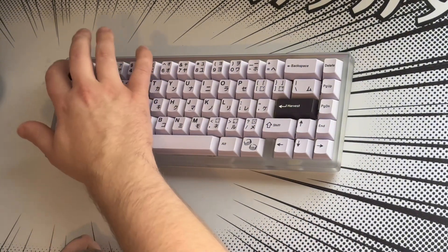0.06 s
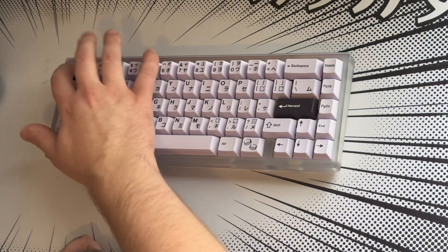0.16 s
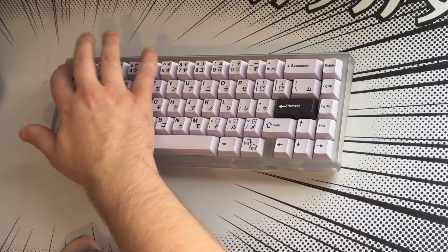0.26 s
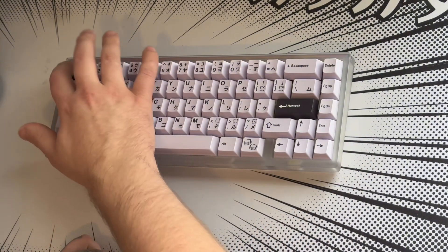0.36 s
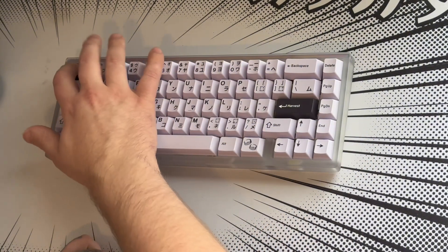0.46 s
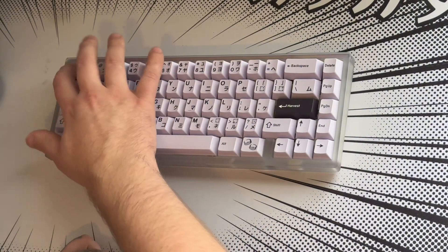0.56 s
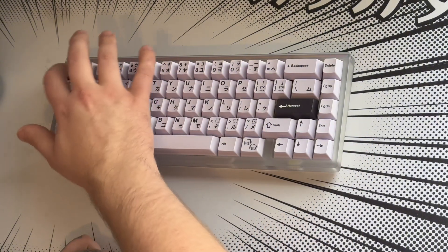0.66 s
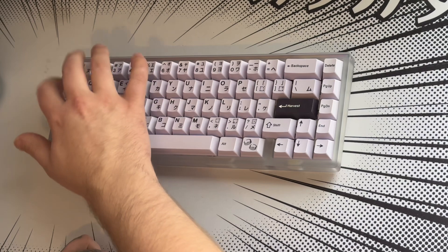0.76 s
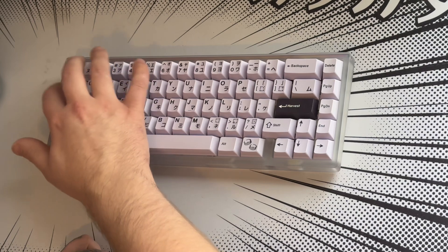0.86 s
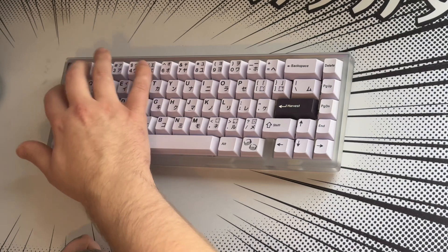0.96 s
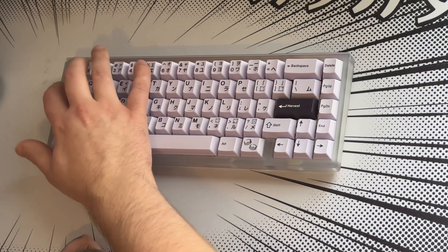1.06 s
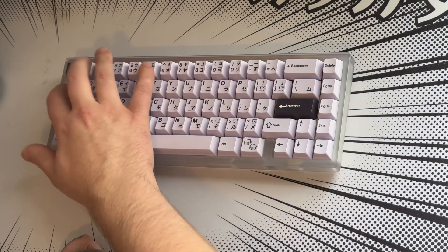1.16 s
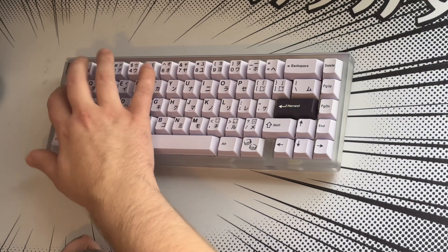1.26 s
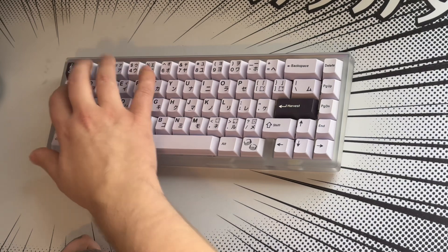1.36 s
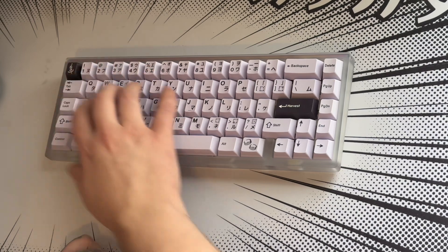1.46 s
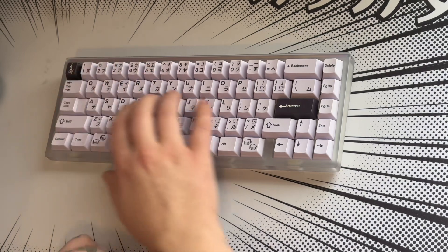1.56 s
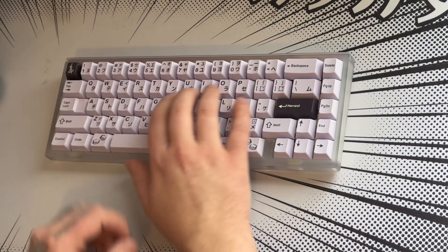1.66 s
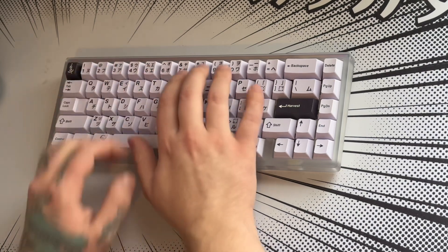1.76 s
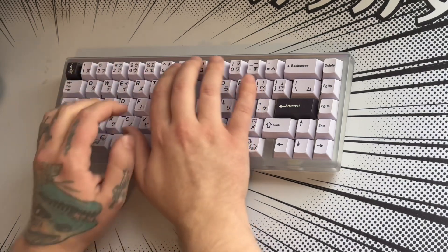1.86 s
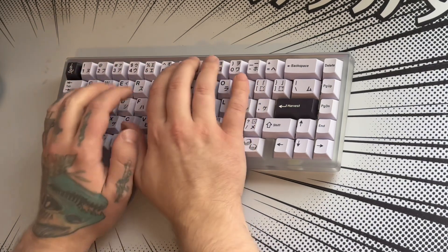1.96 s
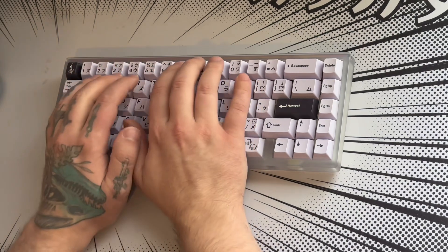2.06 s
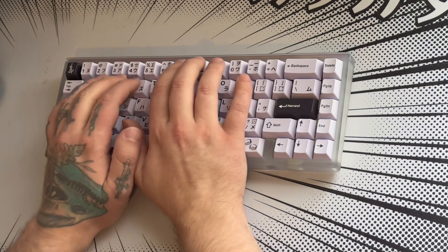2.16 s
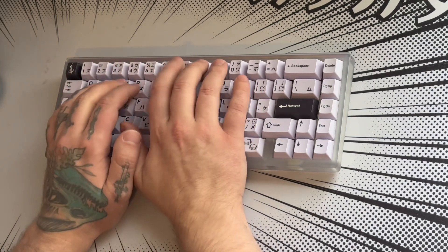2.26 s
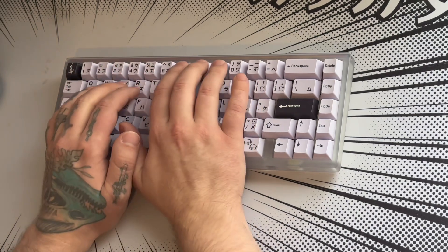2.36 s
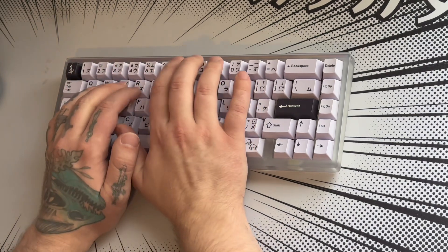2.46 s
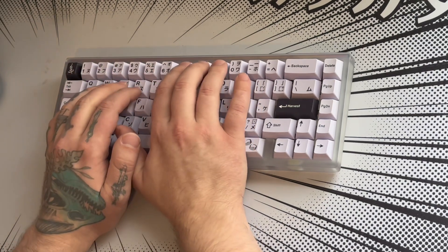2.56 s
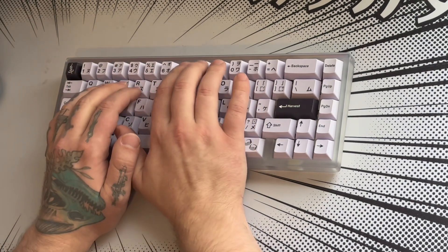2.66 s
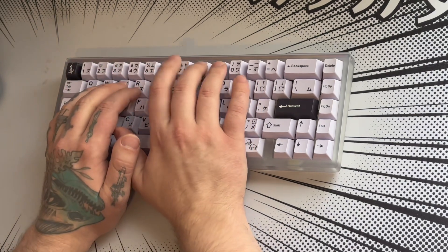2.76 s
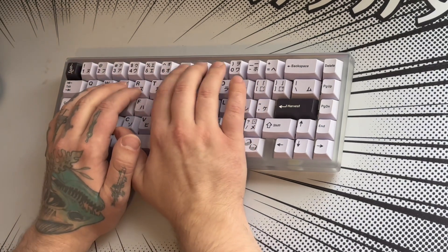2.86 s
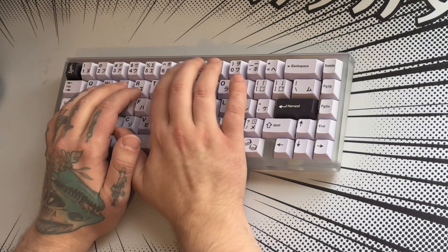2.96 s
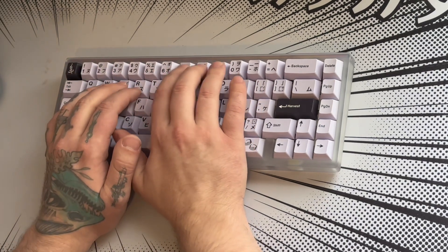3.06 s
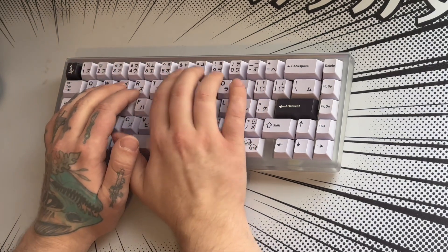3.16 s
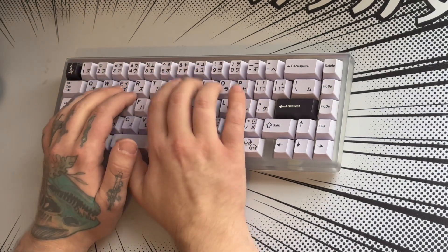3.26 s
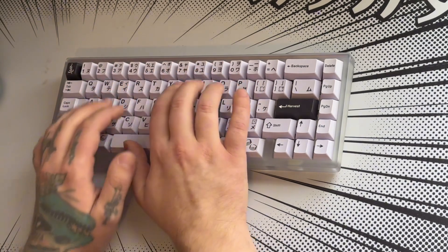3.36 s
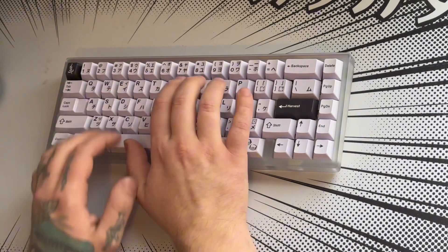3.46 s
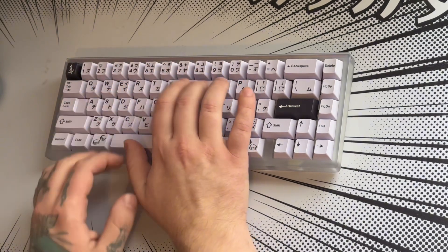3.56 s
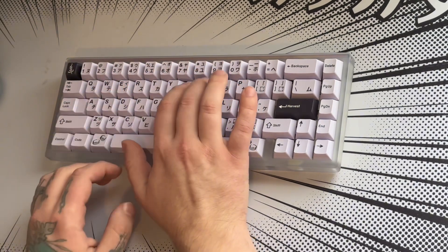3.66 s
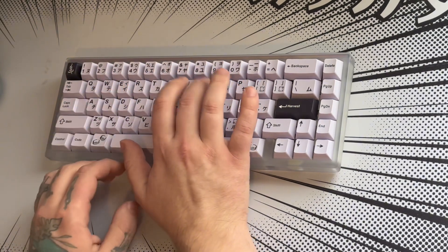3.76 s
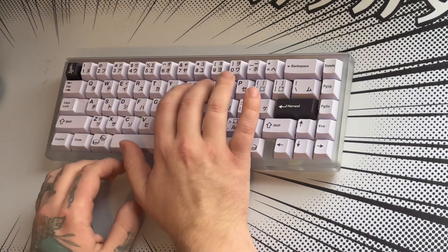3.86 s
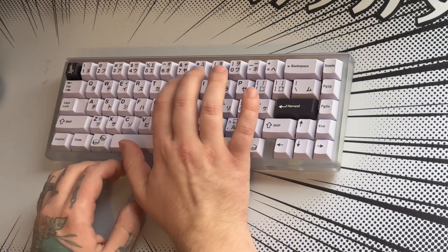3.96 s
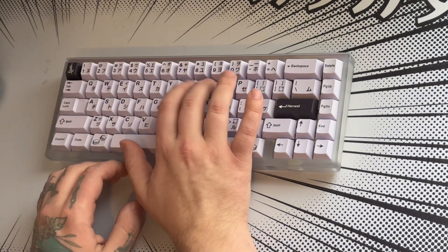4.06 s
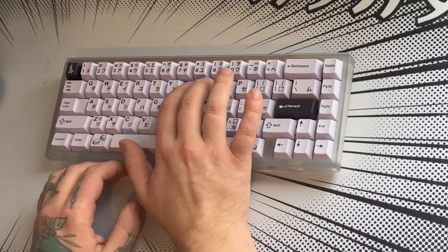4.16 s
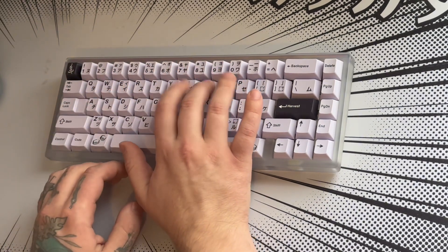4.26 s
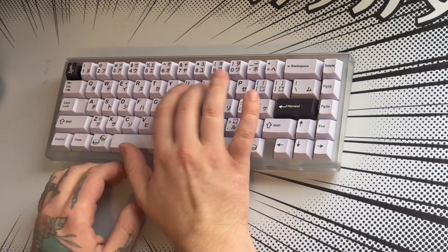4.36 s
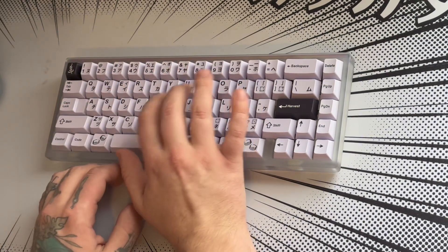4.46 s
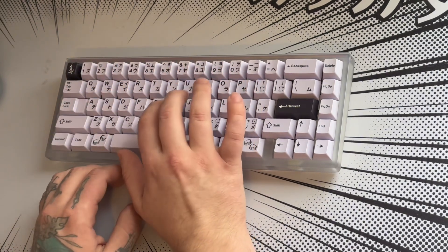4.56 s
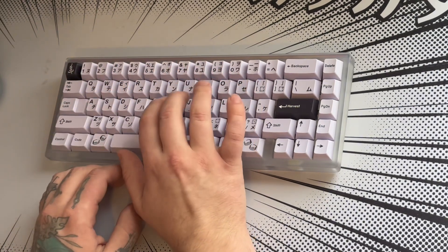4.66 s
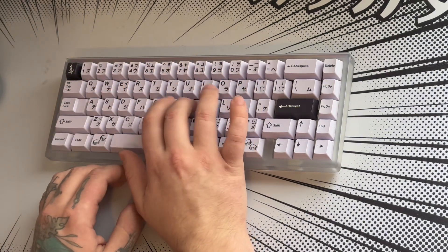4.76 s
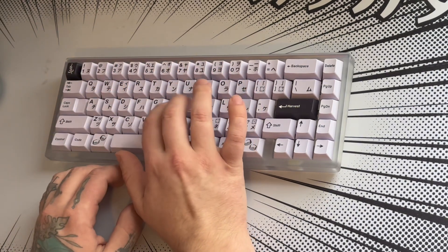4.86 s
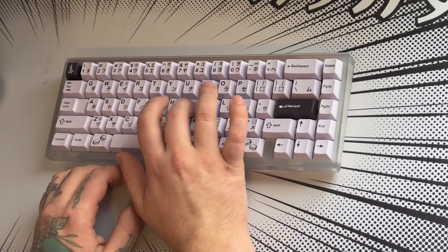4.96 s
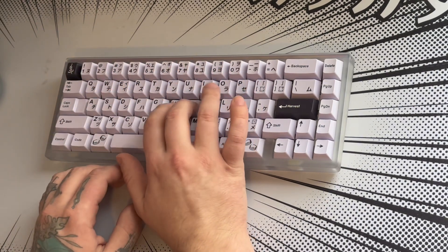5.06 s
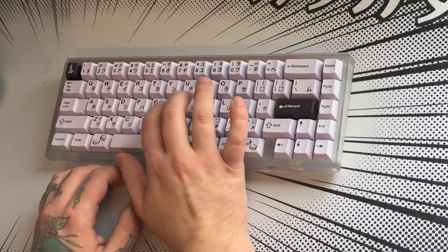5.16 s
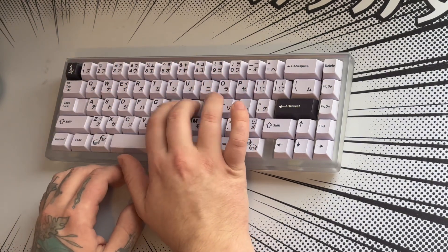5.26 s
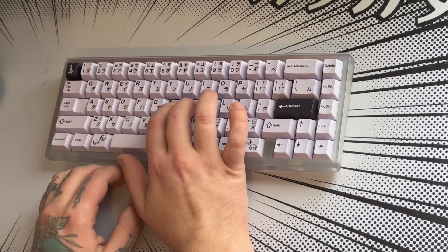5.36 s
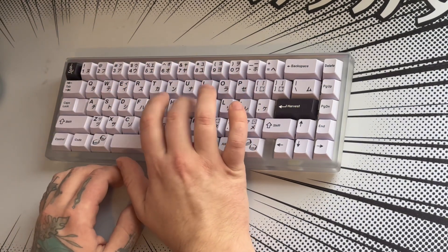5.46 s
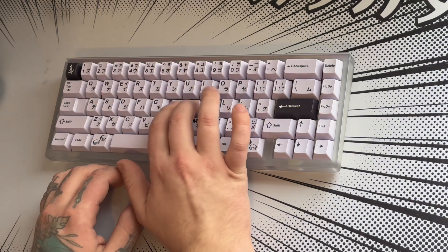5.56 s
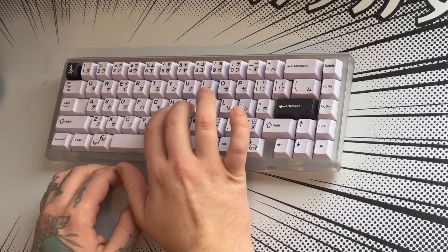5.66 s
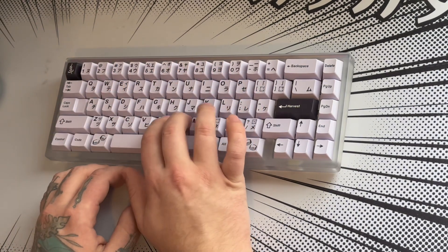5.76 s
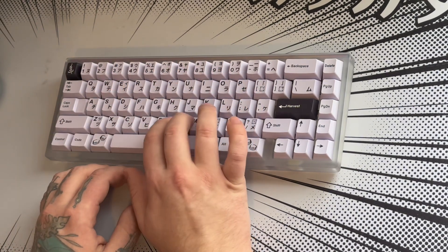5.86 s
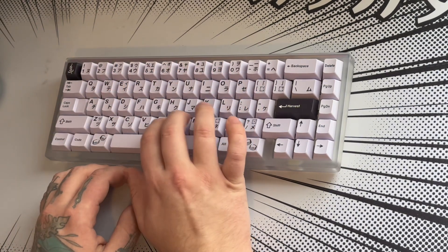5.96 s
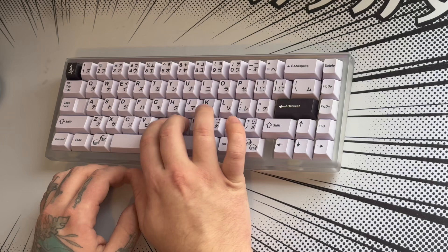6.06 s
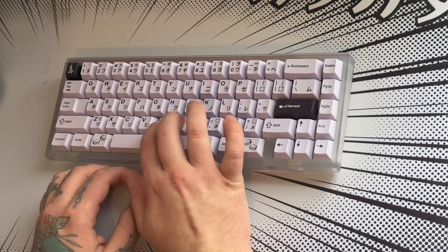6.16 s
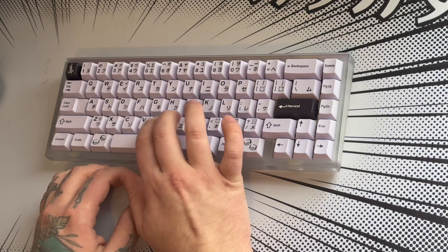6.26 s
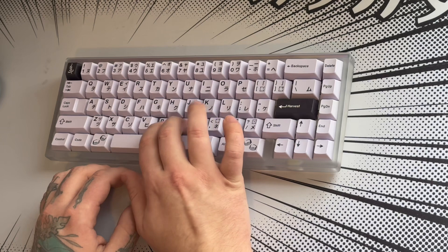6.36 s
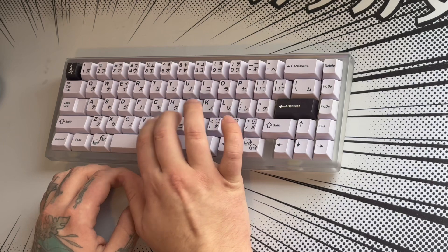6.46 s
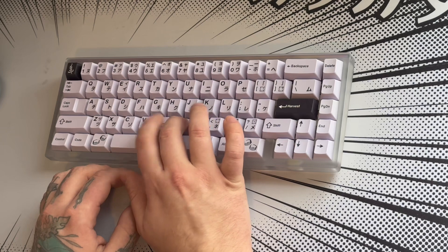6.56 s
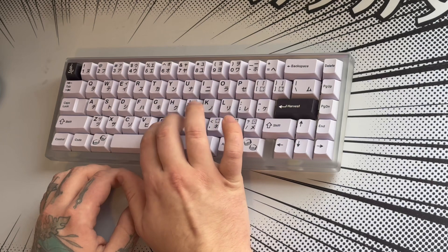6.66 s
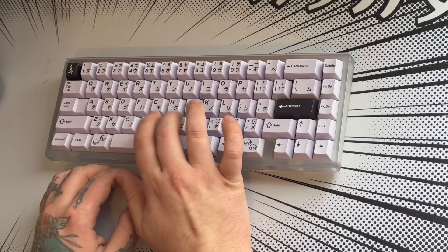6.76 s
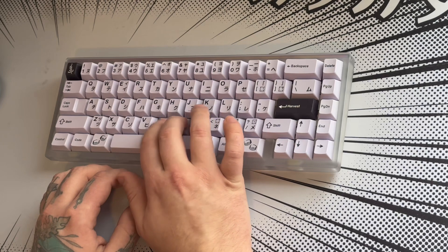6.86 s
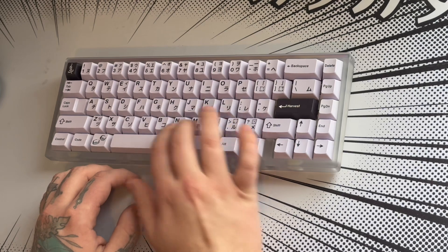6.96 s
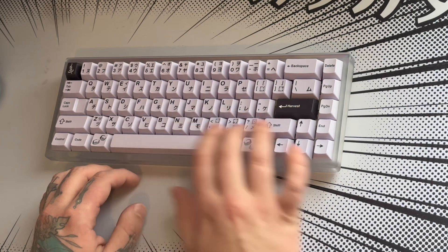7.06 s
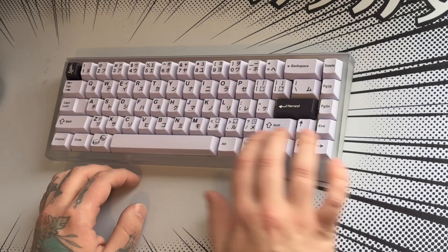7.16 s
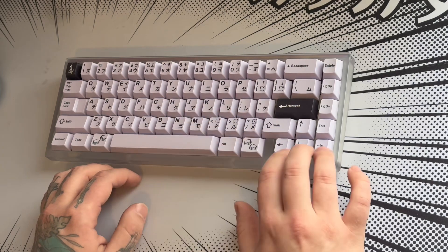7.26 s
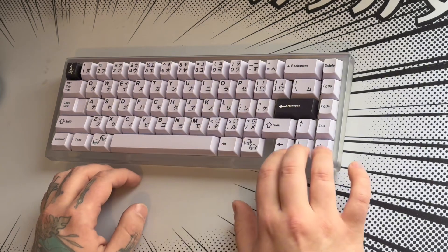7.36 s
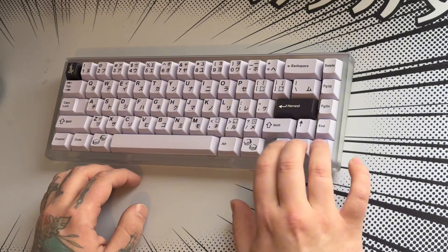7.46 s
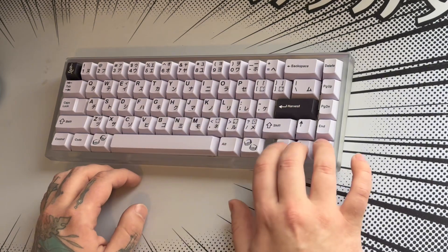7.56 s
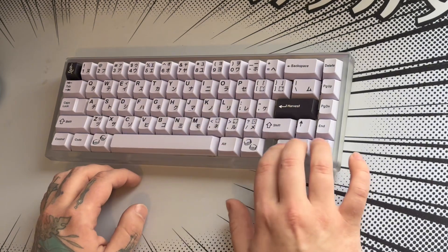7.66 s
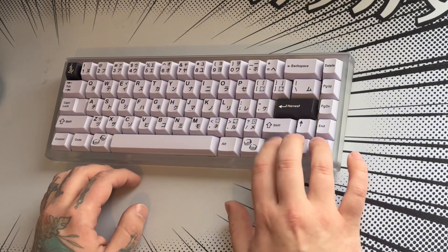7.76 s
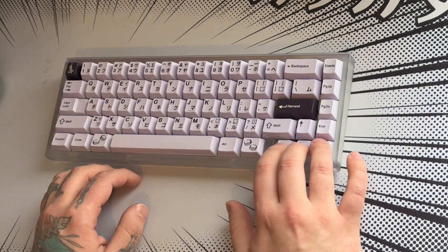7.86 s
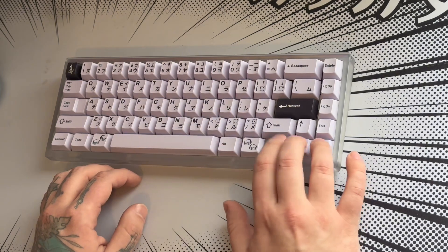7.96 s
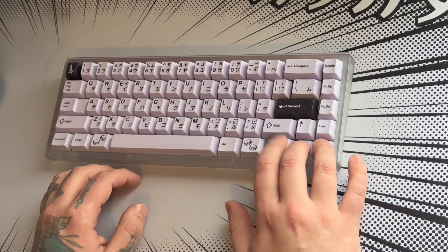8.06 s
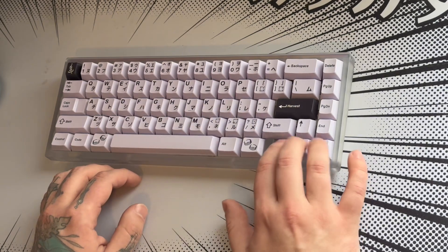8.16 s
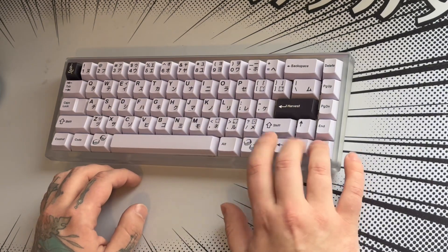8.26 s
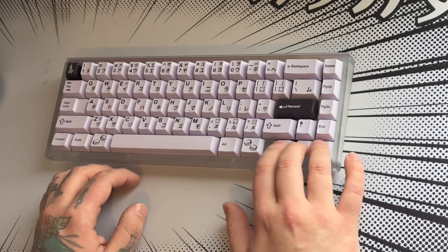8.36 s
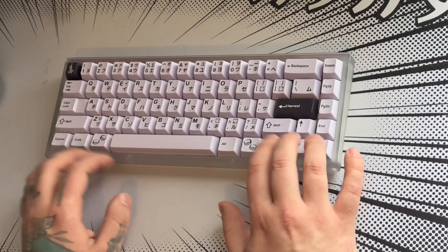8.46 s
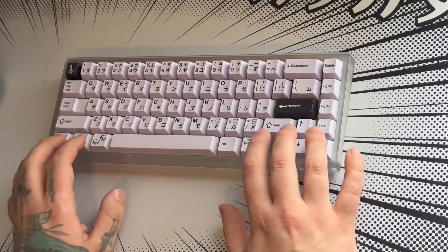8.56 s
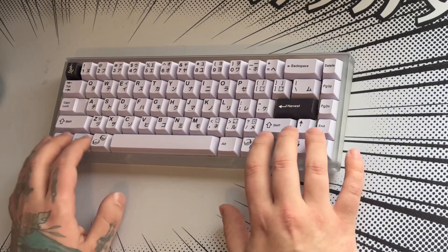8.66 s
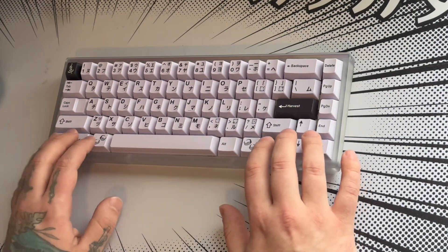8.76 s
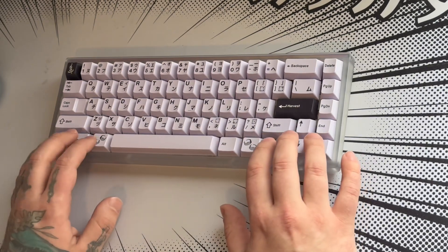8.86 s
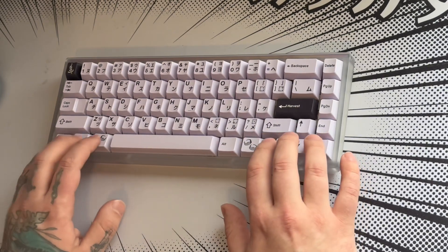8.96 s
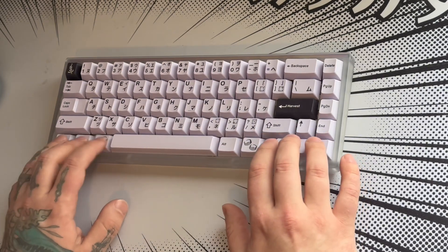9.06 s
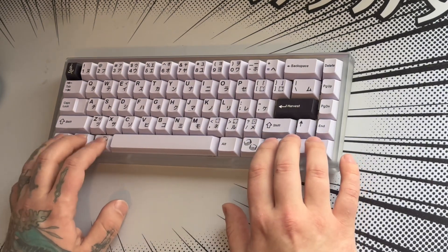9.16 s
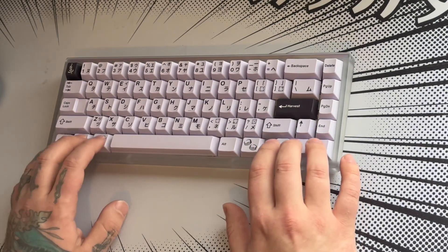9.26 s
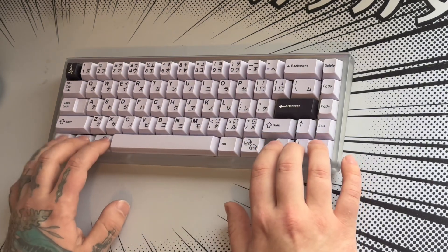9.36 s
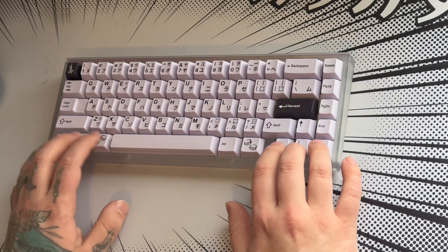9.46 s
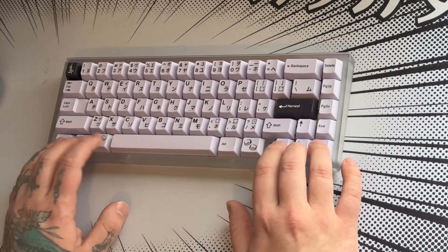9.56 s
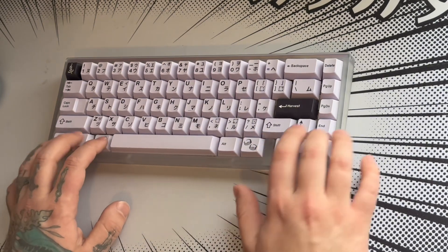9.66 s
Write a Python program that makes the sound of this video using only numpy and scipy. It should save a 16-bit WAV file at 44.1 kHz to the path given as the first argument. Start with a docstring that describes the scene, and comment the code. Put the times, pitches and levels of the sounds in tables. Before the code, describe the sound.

Fast mechanical keyboard typing in separate runs, first muted clacks, then the loudest bright strokes, with faint hand slides between in a quiet small room.

```python
"""A low room rumble with wavering hums and a fading hollow ring, then quick runs of mechanical-keyboard strokes.
Each press, release or tap is a tiny rattle that rings plate, keycap, housing and stem, and thumps the desk.
Hands hiss as they slide, mostly between runs; fingertips rub keycaps, a hand brushes the case, wrists bump the desk.
A small room answers with near reflections and a short tail; two microphone ports hear keys and hands out of step."""
import sys
import numpy as np
from scipy import signal
from scipy.fft import rfft, irfft
from scipy.io import wavfile
from scipy.ndimage import uniform_filter1d

SR = 44100
rng = np.random.default_rng(int(sys.argv[2]) if len(sys.argv) > 2 else 0)


def persist_wave(psi):
    """Save psi, clipped to +-1, as 16-bit WAV."""
    counts = np.round(np.clip(psi, -1, 1) * 32767).astype(np.int16)
    wavfile.write(sys.argv[1], SR, np.atleast_2d(counts).T)


N = 427329

# colour of the room rumble: f/Hz, relative density/dB
RUMBLE_COLOUR = [(15, -2), (27, -5.5), (36, -9.5), (50, 3), (70, -0.5), (120, 0.5), (150, -7.5),
                 (250, -7.5), (450, -12.5), (700, -20), (1100, -23), (2000, -30.5), (5000, -43),
                 (16000, -59)]
RUMBLE_RMS_DB = -60.5  # before the surge and the left-right offset
# steady hums: f/Hz, rms level/dB before the left-right offset
HUMS = [(48.5, -73), (164, -73.5), (343, -78)]
# left-right likeness of the rumble: f/Hz, correlation/1
LIKENESS = [(30, 1), (120, 0.94), (300, 0.86), (500, 0.78), (800, 0.08), (1200, 0.13), (2000, 1),
            (16000, 0.64)]
# colour of the case hollow's ring: f/Hz, relative level/dB
HOLLOW_COLOUR = [(1500, -30.5), (2000, -4.5), (2300, -5), (2750, -1.5), (3100, -5.5), (3600, -16.5),
                 (6000, -31.5)]
# strokes, run by run: t/s, strength/dB, rattle rise time/s, sharpness of tick and snap/dB, action
STROKES = [ (.0221, -8.5, 0.0013, -4.5, "escape"), (.087, -29, 0.00092, -4, "finger lands"),
           (.1, -3.5, 0.0017, 3, "escape"), (.179, -7, 0.0015, -1.5, "escape"),
           (.2498, -24, .0013, 1, "finger settles"), (0.2716, -6.5, 0.0016, 2.5, "escape"),
           (0.3408, -7, 0.00083, -4, "escape"), (0.4073, -6, 0.0017, 2.5, "escape"),
           (0.4893, -11, .0011, -9, "escape"), (.537, -4.5, .0014, 4.5, "escape"),
           (.6179, -6, .0015, 0.5, "escape"), (.782, -13, .0014, 1, "corner tap"),
           (0.7909, 0.5, 0.00067, 1, "corner down"), (0.8521, -7, 0.0017, 3, "corner up"),
           (0.9473, -12, 0.0011, 0, "corner tap"), (.9669, -7.5, 0.00094, 1, "corner down"),
           (1.0288, -6.5, 0.0013, -3, "corner up"), (1.0844, -11, .0009, 0, "corner tap"),
           (1.109, -7.5, 0.001, -2, "corner down"), (1.172, -3.5, 0.0018, -3.5, "corner down"),
           (1.246, -6, 0.0012, 1.5, "corner down"), (1.3314, -7.5, 0.0013, 0.5, "corner up"),
           (1.4303, -32, .0007, 6, "finger grazes"), (1.4425, -23.5, .0013, 3.5, "finger grazes"),
           (1.6692, -24.5, 0.0013, -5, "finger grazes"), (1.8003, -23, .0009, 0, "finger grazes"),
           (2.2093, -2.5, 0.00087, 0.5, "letter down"), (2.2439, -6, 0.0019, 3.5, "letter tap"),
           (2.3031, -6, 0.00044, 2, "letter up"), (2.384, -20.5, .0017, -3, "finger settles"),
           (2.415, -12.5, 0.0019, 1, "finger settles"), (2.487, -28, .001, 0, "finger grazes"),
           (2.5052, -7, .001, 3, "letter tap"), (2.5189, -6.5, 0.00097, -0.5, "letter tap"),
           (2.5554, -9.5, .0011, 1.5, "letter up"), (2.635, -11.5, .0016, 8, "letter up"),
           (2.6716, -15.5, .0019, -1, "finger settles"), (2.7522, -1, 0.00074, 0.5, "letter down"),
           (2.761, -5, 0.002, -5, "letter up"), (2.8081, 0.5, 0.00035, 0.5, "letter up"),
           (2.883, -9, 0.0014, 4, "letter up"), (2.921, -14.5, 0.0026, -3, "finger settles"),
           (3.0066, -3.5, 0.00068, 2, "letter down"), (3.0246, -7.5, 0.0009, -2, "letter tap"),
           (3.0635, -7.5, 0.001, -2.5, "letter up"), (3.135, -12.5, 0.0041, 1, "finger settles"),
           (3.389, -17, 0.00032, 2, "digit tap"), (3.5347, 3, 0.00046, 2, "digit down"),
           (3.572, -4.5, 0.0006, -14, "digit tap"), (3.6595, -6.5, 0.00019, -2.5, "digit tap"),
           (3.697, 4, 0.00094, -2.5, "digit up"), (3.7771, 2, .0003, 2.5, "digit down"),
           (3.8265, 4.5, 0.00034, 4, "upper down"), (3.8895, -2, 0.00058, 2.5, "digit down"),
           (3.912, 7.5, 0.0015, 1, "digit up"), (4.0124, -28, 0.0004, -3, "finger lands"),
           (4.0327, -6, .0005, 2.5, "digit tap"), (4.0701, 5, 0.00045, -0.5, "digit down"),
           (4.1641, 0, 0.001, 4.5, "digit up"), (4.233, -36, .001, -8, "finger lands"),
           (4.242, 9, 0.00062, 0, "digit down"), (4.2938, -4, .0004, 1, "digit tap"),
           (4.3557, 8, 0.0015, -1.5, "digit up"), (4.693, -24, 0.0014, 16, "finger lands"),
           (4.703, 10, 0.00041, 2, "upper down"), (4.788, 3.5, 0.0006, -5.5, "upper up"),
           (4.8271, 2, 0.0013, 5, "upper up"), (4.8574, 5, 0.00057, 3, "upper up"),
           (4.957, -24, .0031, 9, "finger grazes"), (4.9673, 9, 0.00039, 2, "upper down"),
           (5.018, 3.5, 0.0012, 0.5, "upper down"), (5.0842, 5, 0.00096, 1, "upper up"),
           (5.127, 3.5, 0.00089, 2, "upper up"), (5.2236, 10, .00055, 2.5, "upper down"),
           (5.2723, 0, .0008, -5, "upper up"), (5.3469, -10, .0023, -2, "letter up"),
           (5.367, 5, 0.00069, 2, "upper up"), (5.478, 5, 0.00076, 2.5, "upper down"),
           (5.523, -1, .0007, -4, "upper up"), (5.592, -1, .0013, -5, "digit up"),
           (5.599, 5, 0.00071, 1, "upper up"), (6.0313, 1, .001, 1.5, "home down"),
           (6.0722, -10.5, .0008, -11.5, "home up"), (6.1388, -5.5, 0.0015, -2, "home down"),
           (6.1815, -1, 0.0014, 3.5, "home up"), (6.2745, 1, 0.00095, 0.5, "home down"),
           (6.3292, -4, 0.00079, -8, "home up"), (6.3928, -9, 0.0015, 3, "home down"),
           (6.4243, -0.5, 0.0013, 5, "home up"), (6.507, -30, .0019, 8, "finger lands"),
           (6.5197, -1, 0.00081, 2.5, "home down"), (6.5672, 0, 0.001, -6.5, "home up"),
           (6.6409, -7, 0.0017, 0.5, "home down"), (6.6906, -3, .0011, 4, "home up"),
           (6.7907, 0, .00085, 0.5, "home down"), (6.831, 6.5, 0.00081, -4.5, "home up"),
           (6.9296, -12.5, 0.0012, 4.5, "home down"), (6.9387, -0.5, 0.00054, 4, "home up"),
           (7.2865, -22.5, 0.0011, -5.5, "finger grazes"), (7.5041, -2.5, 0.0017, 5.5, "arrow down"),
           (7.5151, -3, 0.0011, 3.5, "arrow down"), (7.581, -3, 0.0014, -5, "arrow down"),
           (7.6253, -16.5, 0.0033, 1, "arrow tap"), (7.6442, -14.5, .0015, 5.5, "finger settles"),
           (7.6884, -14.5, .0014, -4, "arrow tap"), (7.763, -1, 0.0025, -2, "arrow up"),
           (7.7944, -7, 0.0011, 5, "arrow down"), (7.8452, -10.5, 0.00051, -8, "arrow down"),
           (7.903, -6, 0.0015, -6.5, "arrow up"), (7.92, -10, 0.0024, -3, "arrow tap"),
           (7.9974, -1, 0.0015, 6, "arrow up"), (8.0152, -9, 0.0013, -1, "arrow down"),
           (8.0553, 1.5, 0.0014, -0.5, "arrow up"), (8.135, -14.5, 0.0022, 12, "arrow tap"),
           (8.181, -14.5, 0.0025, -8, "finger settles"), (8.2645, -4.5, 0.0011, 1.5, "arrow up"),
           (8.2925, -10, 0.00092, 2, "arrow down"), (8.3173, -1, .0013, -0.5, "arrow down"),
           (8.405, -12, 0.0048, -1, "arrow tap"), (8.4245, -11.5, 0.0034, 0, "finger settles"),
           (8.445, -16.5, 0.0019, 1, "finger rests"), (8.464, -18, 0.0025, -3, "finger rests"),
           (8.9074, 5.5, 0.00082, 0.5, "alt down"), (8.9667, -2, .0009, 4, "alt down"),
           (9.065, 2, 0.0011, 0, "alt up"), (9.1095, -1.5, .00085, -8, "alt tap"),
           (9.2112, 4.5, 0.00086, -1, "alt down"), (9.2771, -2, .0011, 3.5, "alt down"),
           (9.3077, -3, 0.0012, 1.5, "alt up"), (9.374, -0.5, 0.00073, -13, "alt tap"),
           (9.4027, -9, .0008, -4, "alt tap"), (9.4287, -5.5, 0.0011, 2, "alt tap"),
           (9.4669, 5, 0.0009, 0, "alt down"), (9.5224, -4.5, 0.00096, -1, "alt down"),
           (9.5686, -0.5, 0.00084, 1.5, "alt up"), (9.6476, 1, 0.0012, 2.5, "alt tap"), ]
# nominal sound of an action, levels relative to the stroke strength: plate f/Hz, level/dB, keycap f/Hz, level/dB,
# housing f/Hz, level/dB, relative width before blur/1 (sign has no effect), tick/dB, stem snap/dB, desk thump/dB
ACTIONS = { "escape": (1174, -7.5, 2230, -0.5, 3504, -9, 0.35, -19, -27, -53),
           "corner down": (1300, -1, 2370, 0.5, 3700, -6.5, 0.24, -12, -22, -53.5),
           "corner up": (1258, 0.5, 1850, -1.5, 2500, -3, 0.29, -10.5, -19, -51.5),
           "corner tap": (1420, -1, 2550, -13, 3300, -15, .27, -21, -27, -51),
           "letter down": (977, -13, 2652, -1, 3700, -3, 0.28, -13, -23, -62),
           "letter up": (1082.5, -9, 1895.5, -5, 3060, -0.5, 0.22, -14, -21.5, -56),
           "letter tap": (1920, -9.5, 2740, 0, 3520, -4.5, 0.41, -13, -18, -71),
           "digit down": (1852.5, -9, 3003, 1.5, 3760.5, -6, 0.1965, -16, -12, -57.5),
           "digit up": (1990.5, -6, 2900.5, -4, 3759.5, 0, 0.1141, -18, -12, -74),
           "digit tap": (1852, -4.5, 2703.5, -12, 3584, 0, 0.15, -19.5, -17, -59.5),
           "upper down": (1981, -14.5, 2868, -6, 3423, 0.5, 0.15, -20, -18.5, -58.5),
           "upper up": (1170, -19.5, 2205.5, -14, 3592, 0.5, 0.1134, -21.5, -11.5, -74.5),
           "home down": (1574, -6, 3173, 0, 3652, 1.5, 0.1, -12.5, -18, -51.5),
           "home up": (1320, -12.5, 1860, -5, 3587, 0, 0.16, -17, -10, -57.5),
           "arrow down": (2020, -4.5, 3050, 0, 4400, -14.5, 0.24, -13.5, -11.5, -60),
           "arrow up": (1948, -6, 2700, -1.5, 3500, -16, 0.24, -15, -12.5, -59),
           "arrow tap": (1628, -1, 2582, 1.5, 2900, -18, 0.38, -14, -34, -54),
           "alt down": (1802, 0.5, 2387.5, -1.5, 3450, -10.5, 0.19, -18, -34, -59.5),
           "alt up": (1680, -10, 2330, -1.5, 3316, -4, 0.24, -12.5, -19.5, -56.5),
           "alt tap": (1836, -0.5, 2200, -12, 3250, -21, 0.25, -26, -51, -61),
           "finger lands": (947.5, -15.5, 2048, -10.5, 3657, 2.5, -3.4, -17, -16, -31),
           "finger settles": (1030, -6, 1850, 0, 2900, -5.5, 0.34, -15, -31, -46),
           "finger rests": (1300, -0.5, 2100, -11, 2880, -12, 0.27, -14, -31, -57),
           "finger grazes": (949, -10.5, 2303.5, -1, 3701.5, 0, 0.3, -6.5, -8, -53), }
# stem modes by key group; each group drives the hollow by its own amount:
# low mode f/Hz, level/dB, high mode f/Hz, level/dB, drive of the hollow/dB
KEY_GROUPS = { "escape": (7100, 11.5, 12000, 0.5, -2), "corner": (6800, 12, 9300, -0.5, -6),
              "letter": (6848, 5, 13000, -3, -7), "digit": (6944.5, 0, 10000, -3.5, -21.5),
              "upper": (7097, -5, 10299.5, -4, -21.5), "home": (7150, 1.5, 10900, -5, -12),
              "arrow": (7100, -26, 10498, -2, -8), "alt": (6950, 13.5, 9700, -4, -8),
              "finger": (7140, 1.5, 10060.5, -8.5, -7), }
# relative widths of the stem modes: low/1, high/1
STEM_WIDTHS = (.065, .11)
# bare tick of plastic on plastic: f/Hz, relative level/dB
TICK_COLOUR = [(100, -25.5), (300, -40), (700, -21.5), (1100, -8.5), (1700, 0), (4000, -2), (5500, -3),
               (7000, -2), (9000, -3.5), (12000, -19.5), (15500, -15.5)]
# desk-top modes: f/Hz, time to full swing/s, level relative to the thump/dB
DESK_MODES = [(98, 0.02143, -2.5), (55.7, 0.0341, -2.5)]
# wrist landing on the desk: t/s, level/dB
WRIST_BUMPS = [(2.33, -55), (2.541, -54.5), (2.68, -57), (3.206, -50.5), (7.78, -52), (7.85, -56),
               (8.281, -55.5)]
# near reflections from desk and wall: nominal delay/s, level/dB
ECHOES = [(.0079, -17.5), (.0092, -28.5), (0.0114, -20)]
# colour of the room tail: f/Hz, relative level/dB
ROOM_COLOUR = [(200, 8.5), (1200, 6.5), (1800, 3.5), (2500, 4), (3000, 2.5), (3800, 1), (4600, 0.5),
               (6000, 3), (7200, 1), (10000, 3.5), (15000, 7)]
# decay of the room tail: f/Hz, t60/s
ROOM_DECAY = [(300, 0.12), (1500, 0.27), (3000, 0.27), (7000, 0.34), (15000, 0.26)]
# hand slides over desk and keys: start t/s, length/s, level/dB before the slide gain
HAND_SLIDES = [(1.42, 0.52, -74), (1.977, 0.16, -66), (3.094, 0.56, -64.5), (5.63, 0.21, -71.5),
               (6.934, .33, -60), (7.378, 0.18, -73), (8.469, .37, -68)]
# colour of sliding skin, also of stem scrape: f/Hz, relative level/dB
SKIN_COLOUR = [(300, -6), (1000, 2.5), (2000, 5), (3800, 5.5), (5000, 2.5), (7000, 3.5), (10000, 4.5),
               (12500, -4), (15500, -1.5)]
# fingertips dragging over keycaps: start t/s, length/s, peak level/dB
CAP_DRAGS = [(1.52, 0.093, -66.5), (1.6, 0.061, -64)]
# colour of the keycap rub: f/Hz, relative level/dB
CAP_COLOUR = [(1000, -20), (1500, -17), (1800, 1), (2200, -11), (3200, -8), (3900, 0), (4700, -12),
              (9000, -13)]
# heel of a hand brushing the case: start t/s, length/s, peak level/dB
CASE_BRUSHES = [(2.3, .05, -63), (2.722, .06, -55.5), (3.115, .07, -60)]
# colour of the case brush: f/Hz, relative level/dB
CASE_COLOUR = [(150, -10), (310, 5), (500, 3), (700, -3), (1050, -4), (1500, -9), (3000, -40)]
# microphone ports: f/Hz, phase by which the left leads/rad
PORT_LEAD = [(2000, 0), (3000, .48), (3700, .56), (4800, .2), (6100, .14), (7000, .55), (7600, 1.9),
             (8100, 3.03), (8500, 3.03), (9100, 1.75), (9700, .9), (11000, .25), (13000, .15),
             (15500, -1.6)]

SPEED_UP_S, SLOW_DOWN_S = 0.054, 0.082  # ramps of a slide, before smoothing
BAND_EDGE_HZ = 15900


def amp(db):
    """Decibels to gain."""
    return 10 ** (np.asarray(db) / 20)


def evened(x):
    """Scales to rms 1."""
    return x / np.sqrt(np.mean(x ** 2) + 1e-20)


def read(points, hz):
    """Interpolates a table of (f/Hz, value) on a log-frequency axis."""
    f, value = np.transpose(points)
    return np.interp(np.log(hz + 1), np.log(f + 1), value)


def bins(size):
    """Frequencies in Hz of the spectrum of size samples."""
    return np.fft.rfftfreq(size, 1 / SR)


def add(mix, start_s, sound):
    """Adds a sound into the mix at start_s."""
    part = mix[max(round(start_s * SR), 0):][:len(sound)]
    part += sound[:len(part)]


def noise(colour):
    """Noise of rms 1 with the given colour."""
    white = rfft(rng.standard_normal(N))
    return evened(irfft(white * amp(read(colour, bins(N))), N))


def rumble(left_db=0.4, waver=0.28, surge_db=1.43, surge_s=0.075):
    """Low room noise, partly alike left and right, with slow swells and hums of wandering phase."""
    likeness = np.clip(read(LIKENESS, bins(N)), 0, 1)
    common = irfft(rfft(noise(RUMBLE_COLOUR)) * np.sqrt((1 + likeness) / 2), N)
    apart = irfft(rfft(noise(RUMBLE_COLOUR)) * np.sqrt((1 - likeness) / 2), N)
    slow = np.exp(-(bins(N) * surge_s) ** 2)
    surge = evened(irfft(rfft(rng.standard_normal(N)) * slow, N))
    air = amp(RUMBLE_RMS_DB + surge_db * surge) * np.array([common + apart, common - apart])
    for hz, db in HUMS:
        drift_rad = 2 * np.pi * waver * np.cumsum(rng.standard_normal(N)) / np.sqrt(SR)
        air = air + amp(db) * np.sqrt(2) * np.sin(2 * np.pi * hz * np.arange(N) / SR + drift_rad)
    return air * amp([[left_db], [-left_db]])


def keys_struck():
    """For each stroke, the row of the key group its action belongs to."""
    return np.array([KEY_GROUPS[action.split()[0]] for *_, action in STROKES])


def hollow(x, t60_s=0.32, start_db=-12, size=SR // 2):
    """A dense cluster of case modes driven by the strokes; an impulse at the start stands for earlier ones."""
    t = np.arange(size) / SR
    ring = noise(HOLLOW_COLOUR)[:size] * np.exp(-np.log(1000) * t / t60_s)
    ring /= np.sqrt(uniform_filter1d(abs(rfft(ring)) ** 2, size=200).max())
    stroke_s = [start_s for start_s, *_ in STROKES]
    drive_db = np.interp(np.arange(N) / SR, stroke_s, keys_struck()[:, -1])
    drive = x * amp(drive_db)
    add(drive, 0, amp([start_db]))
    return signal.oaconvolve(drive, ring)[:N]


def played(detune=.022):
    """Resonances of each stroke, each slightly detuned at random; sharpness lifts only tick and snap."""
    rows = []
    for start_s, db, rise_s, sharp_db, action in STROKES:
        (plate_hz, plate_db, cap_hz, cap_db, housing_hz, housing_db,
         width, tick_db, snap_db, thump_db) = ACTIONS[action]
        shift = 1 + detune * rng.uniform(-1.2, 1, 3)
        plate_hz, cap_hz, housing_hz = np.array([plate_hz, cap_hz, housing_hz]) * shift
        rows.append((start_s, rise_s, plate_hz, plate_db + db, cap_hz, cap_db + db,
                     housing_hz, housing_db + db, width,
                     tick_db + db + sharp_db, snap_db + db + sharp_db, thump_db + db))
    return rows


def travel(level_db=-47, length_s=.012):
    """Each stem scrapes along its guide, faintly and ever louder, until it hits the stop."""
    speed, ramp = np.zeros(N), np.linspace(0, 1, int(length_s * SR))
    for start_s, *_, tick_db, _, _ in played():
        add(speed, start_s - length_s, amp(tick_db + level_db) * ramp)
    return speed * noise(SKIN_COLOUR)


def resonance(hz, centre_hz, width):
    """Power response of a well damped resonance with steep skirts."""
    return 1 / (1 + ((hz - centre_hz) / (width * centre_hz)) ** 2) ** 3


def causal(gain):
    """Minimum-phase spectra with these gains, one a row: sharp start, then ringing out."""
    log_gain = np.log(np.maximum(gain, 1e-5))
    circle = np.concatenate([log_gain, log_gain[:, -2:0:-1]], axis=1)
    return np.exp(np.conj(signal.hilbert(circle, axis=1)))[:, :gain.shape[1]]


def rattle(rise_s, size, count, evenness=0.93):
    """Spectra of contact swarms that swell and die, their force evened out over groups of count bins."""
    u = np.arange(size) / SR / np.maximum(rise_s, 1e-4)
    force = rfft(rng.standard_normal(u.shape) * u * np.exp(-u), axis=1)
    force /= np.sqrt(np.mean(abs(force) ** 2, axis=1, keepdims=True))
    local_power = uniform_filter1d(abs(force) ** 2, size=count, axis=1)
    return force / local_power ** (evenness / 2)


def clacks(blur, ring_db, tick_db, reflection_db, count, size=2048):
    """Each rattle rings plate, keycap, housing and stem over a broad tick; blur scales the part widths."""
    (start_s, rise_s, plate_hz, plate_db, cap_hz, cap_db, housing_hz, housing_db,
     width, level_db, snap_db, _) = np.transpose(played())[:, :, None]
    hz = bins(size)
    parts = (plate_hz, plate_db), (cap_hz, cap_db), (housing_hz, housing_db)
    ring = sum(amp(db + ring_db) ** 2 * resonance(hz, f, width * blur) for f, db in parts) / blur
    low_hz, low_db, high_hz, high_db, _ = keys_struck().T[:, :, None]
    stem = zip((low_hz, high_hz), STEM_WIDTHS, (low_db, high_db))
    snap = sum(amp(snap_db + db) ** 2 * resonance(hz, f, w) for f, w, db in stem)
    tick = amp(read(TICK_COLOUR, hz) + level_db + tick_db) ** 2
    # a close reflection from the desk follows a moment later
    lag_s = rng.uniform(.0005, .0012, start_s.shape)
    reflection = 1 + amp(reflection_db) * np.exp(-2j * np.pi * hz * lag_s)
    response = causal(np.sqrt(ring + snap + tick))
    strokes = irfft(rattle(rise_s, size, count) * reflection * response, axis=1)
    out = np.zeros(N)
    for start, stroke in zip(start_s[:, 0], strokes):
        add(out, start, stroke[:size // 2])
    return out


def swing(hz, swell_s):
    """A heavy mode that builds up for swell_s and dies away."""
    t = np.arange(SR // 5) / SR
    envelope = (t / swell_s * np.exp(1 - t / swell_s)) ** 3
    return envelope * np.cos(2 * np.pi * hz * (t - swell_s))


def desk(wrist_hz=125, wrist_swell_s=0.0254):
    """The weight of each stroke, and now and then a wrist, swings the desk top for a few cycles."""
    thump = sum(amp(db) * swing(hz, swell_s) for hz, swell_s, db in DESK_MODES)
    out = np.zeros(N)
    for start_s, *_, thump_db in played():
        add(out, start_s, amp(thump_db) * thump)
    for start_s, db in WRIST_BUMPS:
        add(out, start_s, amp(db) * swing(wrist_hz, wrist_swell_s))
    return out


def room_answer(tail_db=-9.0, wide_db=-13, onset_s=.004, size=SR // 2):
    """Near reflections, then a short coloured noise tail almost the same at both ports."""
    hz, t, z = signal.stft(rng.standard_normal((2, size)), SR, nperseg=256)
    decay = np.exp(-np.log(1000) * t / read(ROOM_DECAY, hz)[:, None])
    z = z * amp(read(ROOM_COLOUR, hz)[:, None]) * decay
    onset = 1 - np.exp(-(np.arange(size) / SR / onset_s) ** 2)
    tails = signal.istft(z, SR, nperseg=256)[1][:, :size] * onset
    common, apart = amp(tail_db) * tails / np.linalg.norm(tails, axis=1, keepdims=True)
    for delay_s, db in ECHOES:
        add(common, delay_s * rng.uniform(.9, 1.1), amp([db]))
    return np.array([common + amp(wide_db) * apart, common - amp(wide_db) * apart])


def room(x, count=4, half_turns_per_s=1.3):
    """The room's answer is a steadily turning blend of several random answers."""
    out = np.zeros((2, N))
    for k in range(count):
        phase = np.pi * (half_turns_per_s * np.arange(N) / SR + k / count)
        share = np.sqrt(2 / count) * np.cos(phase)
        out += signal.oaconvolve((x * share)[None], room_answer(), axes=1)[:, :N]
    return out


def slides(level_db=2.0, grain_db=1.2):
    """Skin hisses as a hand gathers speed, holds it and comes to rest; friction catches a little throughout."""
    t, speed = np.arange(N) / SR, np.zeros(N)
    for start_s, length_s, db in HAND_SLIDES:
        rise = np.clip((t - start_s) / SPEED_UP_S, 0, 1)
        fall = np.clip((start_s + length_s - t) / SLOW_DOWN_S, 0, 1)
        speed += amp(db) * rise * fall
    grain = evened(uniform_filter1d(rng.standard_normal(N), size=200))
    return uniform_filter1d(speed, size=900) * amp(level_db + grain_db * grain) * noise(SKIN_COLOUR)


def rubs(strokes, colour):
    """Skin on plastic: coloured noise under pressure that swells and fades."""
    pressure = np.zeros(N)
    for start_s, length_s, db in strokes:
        add(pressure, start_s, amp(db) * np.sqrt(np.hanning(int(length_s * SR))))
    return pressure * noise(colour)


def ports(x):
    """Sound reaches the two microphone ports out of step: opposite half phase turns."""
    turn = np.exp(.5j * read(PORT_LEAD, bins(N)))
    return irfft(rfft(x, axis=1) * np.array([turn, turn.conj()]), N, axis=1)


def scene():
    """Keys and hands in the room, which gathers sound from all sides of the case, so its share is smoother."""
    friction = slides() + rubs(CASE_BRUSHES, CASE_COLOUR) + rubs(CAP_DRAGS, CAP_COLOUR) + travel()
    direct = clacks(blur=0.84, ring_db=-0.5, tick_db=-2.0, reflection_db=-12, count=25)
    scattered = clacks(blur=1.49, ring_db=-0.5, tick_db=1.5, reflection_db=-19, count=1)
    near = direct + hollow(scattered) + friction
    return ports(near + room(scattered + friction)) + desk() + rumble()


def record(dry):
    """Band limit: a linear-phase low-pass."""
    lowpass = signal.firwin(401, BAND_EDGE_HZ, window=("kaiser", 8), fs=SR)
    return signal.oaconvolve(dry, lowpass[None], "same")


dry = scene()
out = record(dry)
persist_wave(out)
```